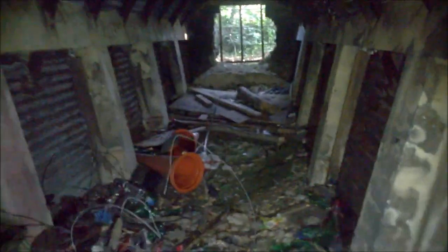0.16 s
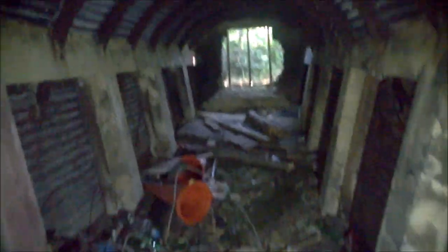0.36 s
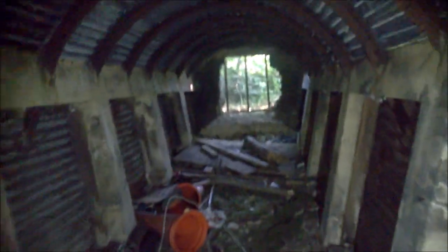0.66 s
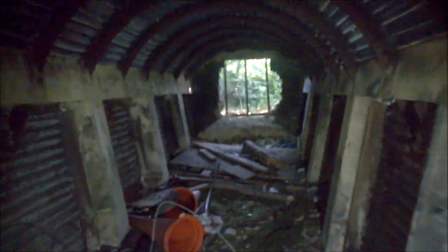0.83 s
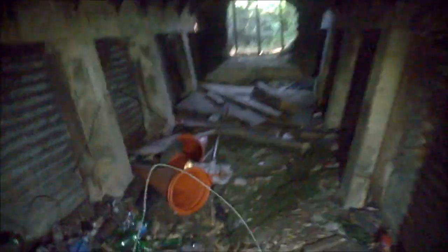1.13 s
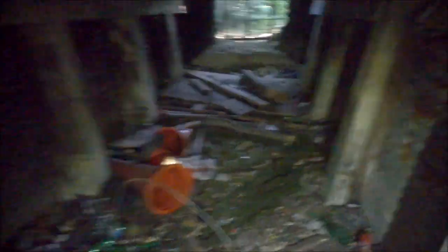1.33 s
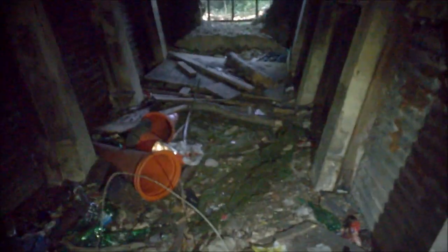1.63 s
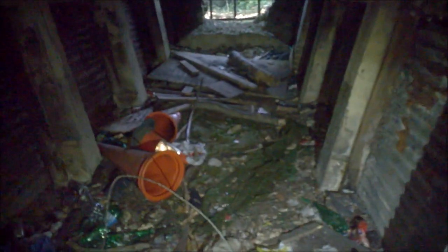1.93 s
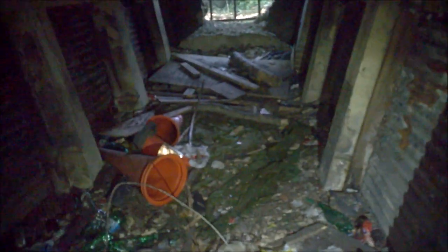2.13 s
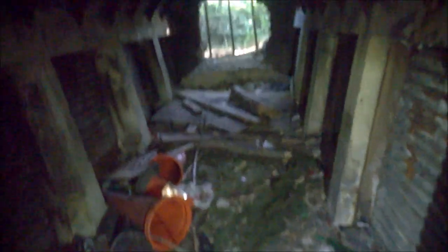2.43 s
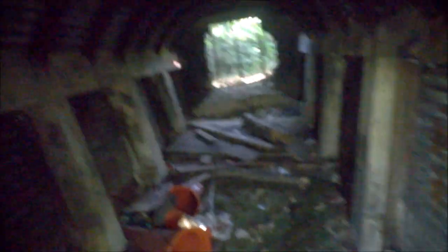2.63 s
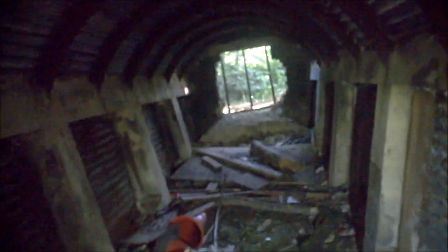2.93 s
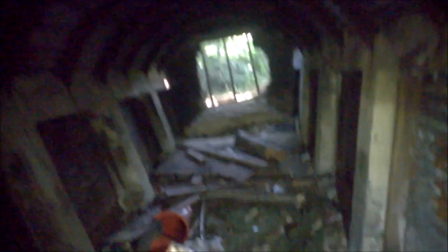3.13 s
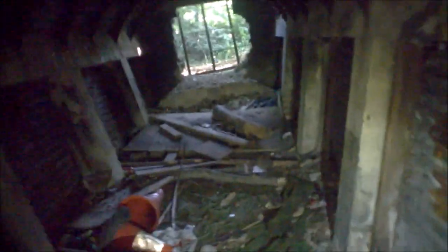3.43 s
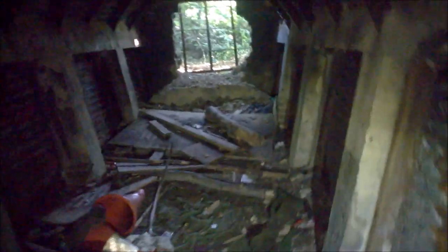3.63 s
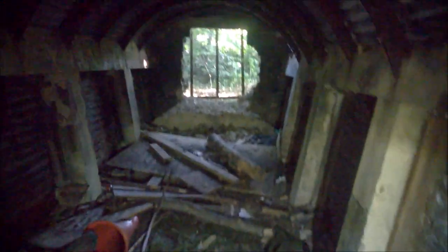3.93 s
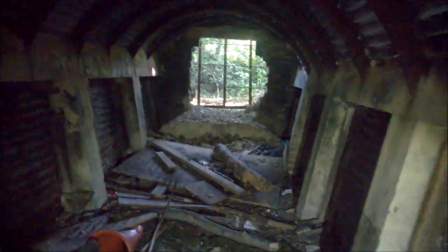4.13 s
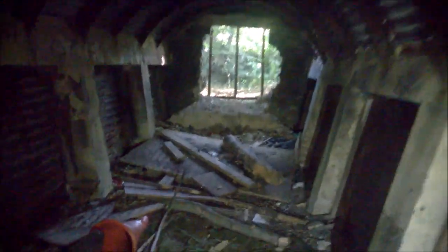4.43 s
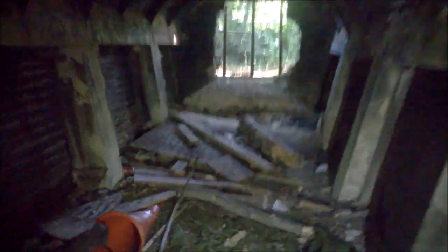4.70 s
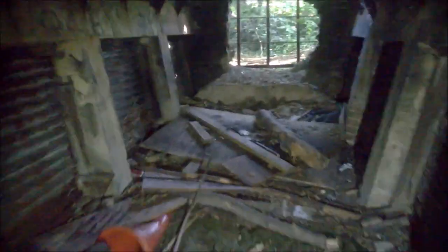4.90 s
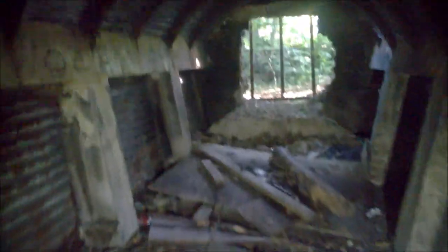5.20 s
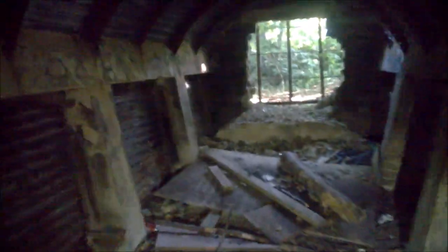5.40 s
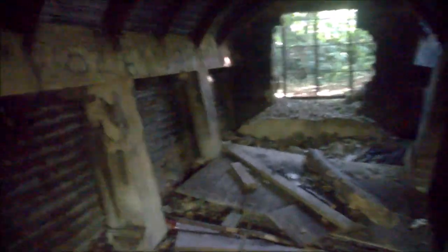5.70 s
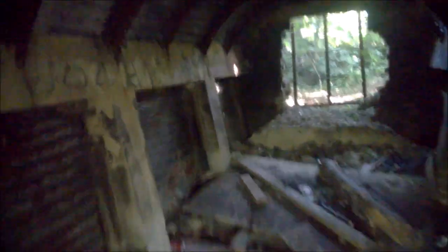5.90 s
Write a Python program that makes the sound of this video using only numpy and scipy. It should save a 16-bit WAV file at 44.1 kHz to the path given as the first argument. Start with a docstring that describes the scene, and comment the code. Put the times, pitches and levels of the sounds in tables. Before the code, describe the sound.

Slow, uneven footsteps cross broken glass and rubble in a narrow concrete tunnel, heard close from a hand-held microphone. Faint air and low handling rumble run throughout, with a soft, airy rustle around 0.3 seconds. From 0.8 to 1.3 seconds a shoe knocks on rubble, grinds grit and snaps shards, and a sliver chinks high and clear at 1.2. Litter ticks lightly as it settles, and a second faint rustle comes around 2.4. More crunching and sandy scraping follow from 2.8 to 3.7, ending in dull knocks. The loudest steps run from about 4.4 to 5.2 seconds, with a sharp, briefly ringing glass snap near 4.7, a gritty scrape at 4.9 and another crack at 5.2. Two light scuffs end the walk at about 5.4 and 5.8. The close walls give every step a dense, short echo.

```python
"""Slow, uneven steps on broken glass and rubble in a narrow concrete tunnel, heard from a hand-held camera.
Faint air and hand rumble come first, with a faint rustle. Near 1 s a shoe knocks on rubble, grinds grit and
snaps shards, and a sliver chinks. After a second rustle, more steps crunch near 3 s and, loudest, near 4.7 s;
between them the litter ticks and settles. Two light scuffs end the walk just before 6 s. Throughout, the close
walls answer the steps with a dense, short echo."""
import sys
import numpy as np
from scipy import signal
from scipy.fft import rfft, irfft
from scipy.io import wavfile
from scipy.ndimage import uniform_filter1d

SR = 44100
rng = np.random.default_rng(int(sys.argv[2]) if len(sys.argv) > 2 else 0)


def put_to_file(sound):
    """Save the sound as 16-bit audio at rate SR, in the file named by the first command-line argument."""
    columns = np.atleast_2d(sound).T  # one column per channel
    safe = np.clip(columns, -1, 1)
    whole_steps = np.round(safe * 32767)
    wavfile.write(sys.argv[1], SR, whole_steps.astype(np.int16))


N = 266981
ECHO_SAMPLES = SR // 2


def amp(db):
    """Turns decibels into a gain."""
    return 10 ** (np.asarray(db) / 20)


def unit_rms(x):
    """Scales a signal to an average power of 1."""
    return x / np.sqrt(np.mean(x ** 2) + 1e-20)


def unit_energy(x):
    """Scales a signal to a total energy of 1."""
    return x / np.linalg.norm(x)


def look_up(points, hz):
    """Reads between the rows of a table on a log-frequency axis."""
    f, value = np.transpose(points)
    return np.interp(np.log(hz + 1), np.log(f + 1), value)


def add(mix, s, sound):
    """Lays a sound into the mix at s seconds."""
    part = mix[round(s * SR):][:len(sound)]
    part += sound[:len(part)]


def pulse(gain, size=4096):
    """The shortest click whose spectrum is gain(Hz); it also serves as a filter."""
    f = abs(np.fft.fftfreq(size, 1 / SR)) + 1
    log_gain = np.log(np.maximum(gain(f), 1e-5))
    spectrum = np.exp(np.conj(signal.hilbert(log_gain)))  # minimum phase: the energy comes early
    return np.fft.ifft(spectrum).real[:size // 2]


def hump(f, hz, octaves):
    """A broad, heavily damped resonance around hz."""
    return 1 / (1 + (np.log2(f / hz) / octaves) ** 2)


def lumps(f, depth_db, count=60):
    """Every piece of debris has its own uneven set of damped resonances."""
    log_hz = np.linspace(np.log(200), np.log(SR / 2), count)
    heights = rng.standard_normal(count).clip(-2, 2)
    return amp(depth_db * np.interp(np.log(f), log_hz, heights))


def wander(per_s):
    """A curve that drifts to a new random value per_s times a second."""
    knots = rng.standard_normal(N // 20)
    return unit_rms(np.interp(np.arange(N) * per_s / SR, np.arange(len(knots)), knots))


def grains(t, colour, per_s, size_db, clump_db, lumpy_db=2):
    """Debris of one size gives way in clumps of tiny fractures, a few of them large."""
    sizes = amp(size_db * np.minimum(rng.exponential(1, N), 4) + clump_db * wander(90))
    clicks = sizes * rng.choice([-1., 1.], N) * (rng.random(N) < per_s / SR)
    one_grain = pulse(lambda f: colour(f) * lumps(f, lumpy_db))
    return unit_rms(signal.fftconvolve(clicks[:len(t)], one_grain)[:len(t)])


def tunnel(direct_db, build_s=0.004033, wall_s=0.0039, wall_gain=0.17666,
           vault_s=0.018868, vault_width_s=0.02419, shade_hz=5500):
    """The direct sound, a slap off the near wall, then echoes that thicken as the roof throws them back."""
    # how long the echo takes to fall by 60 dB: f/Hz, time/s
    echo_times = [(150, 0.34335), (400, 0.31614), (1400, 0.20912), (3700, 0.21823), (9000, 0.18254),
                  (16000, 0.10545)]
    t = np.arange(ECHO_SAMPLES) / SR
    bounces = rng.choice([-1., 1.], len(t)) * amp(2.5 * rng.standard_normal(len(t)).clip(-2, 2))
    bounces *= rng.random(len(t)) < .15 + 2 * t  # sparse at first, then dense
    bounces *= 1 - np.exp(-t / build_s)
    bounces *= 1 + np.exp(-((t - vault_s) / vault_width_s) ** 2)  # a swell from the arched roof
    hz, frame_s, spectra = signal.stft(bounces, SR, nperseg=256)
    fade = amp(-60 * frame_s / look_up(echo_times, hz)[:, None])
    echoes = unit_energy(signal.istft(spectra * fade, SR, nperseg=256)[1][:len(t)])
    shaded = pulse(lambda f: 1 / np.hypot(1, f / shade_hz))  # the camera's body blocks treble from below
    add(echoes, 0, amp(direct_db) * shaded)
    add(echoes, wall_s, wall_gain * shaded)
    return unit_energy(echoes)


def in_tunnel(db, sound, direct_db):
    """Gives a short sound its echo; db is the level it would have if spread over 1/20 s."""
    return amp(db) * np.sqrt(SR / 20) * unit_energy(signal.fftconvolve(sound, tunnel(direct_db)))


def standing_waves(x):
    """The narrow passage favours a few low notes and weakens one."""
    # standing waves between floor and roof: f/Hz, width/Hz, gain/dB
    notes = [(188.53, 6.85, 3.5), (325.26, 29.15, 4), (421.26, 26.27, -3), (458.43, 17.84, 2.5),
             (606.25, 49.07, 2.5)]

    def gain(f):
        return amp(sum(db / (1 + (2 * (f - hz) / width) ** 2) for hz, width, db in notes))
    return signal.oaconvolve(x, pulse(gain, size=16384))[:N]


def noise(colour):
    """Steady noise whose spectrum follows colour(Hz)."""
    f = np.fft.rfftfreq(N, 1 / SR) + 1
    return unit_rms(irfft(rfft(rng.standard_normal(N)) * colour(f), N))


def still_air(level_db=-61.5, waver_db=1.2):
    """The faint hush of the tunnel, wavering a little."""
    # colour of still air and handling rumble: f/Hz, level/dB
    air_colour = [(12, -18), (20, -1), (70, -4.5), (120, -19), (172, -18), (718, -18.5), (1000, -20),
                  (1440, -23), (1660, -24), (2320, -23.5), (2750, -25.5), (3250, -27), (16000, -41)]
    hush = noise(lambda f: amp(look_up(air_colour, f)))
    return amp(level_db) * hush * amp(waver_db * wander(8))


def settling_crumbs(level_db=-73):
    """The litter ticks as it settles, heard mostly as echo."""
    crumbs = grains(np.arange(N) / SR, lambda f: hump(f, 1500, 1.5), per_s=90, size_db=4.5, clump_db=2)
    return amp(level_db) * unit_rms(signal.fftconvolve(crumbs, tunnel(direct_db=-14.5))[:N])


def hand_rumble(gain_db=-1, steady_db=-61.5, hz=46, octaves=0.8751):
    """The hand that carries the camera rumbles, more so when it sways with the walk."""
    # sways of the hand: middle t/s, half length/s, level/dB
    sways = [(.35, 0.4, -53.5), (1.147, 0.3183, -55), (3.504, 0.42, -57.5), (5.247, 0.4686, -53)]
    t = np.arange(N) / SR
    rumble = noise(lambda f: hump(f, hz, octaves) ** 2)
    sway = sum(amp(db) * np.exp(-((t - s) / half_s) ** 2) for s, half_s, db in sways)
    return amp(gain_db) * np.hypot(amp(steady_db), sway) * rumble


def splinter_ticks(hz=8500, octaves=1.137):
    """A splinter parts with one needle-sharp click."""
    # tiny splinters cracking at the edge of the sole: t/s, level/dB
    ticks = [(0.834, -53.5), (1.037, -61.5), (1.1111, -58), (1.1255, -53.5), (1.144, -52.5), (1.194, -44),
             (2.805, -60.5), (3.471, -56.5), (3.789, -63)]
    out = np.zeros(N)
    for s, db in ticks:
        click = pulse(lambda f: hump(f, hz, octaves) * lumps(f, depth_db=2.08))
        add(out, s, in_tunnel(db, click, direct_db=3.5))
    return out


def ringing(tones, detune):
    """The dying tones of a piece of glass, a little different at each blow."""
    t = np.arange(SR // 4) / SR
    ring = np.zeros(len(t))
    for hz, db, fade_s in tones:
        pitch_hz = hz * (1 + detune * rng.uniform(-0.992, 1))
        ring += amp(db - 60 * t / fade_s) * np.sin(2 * np.pi * (pitch_hz * t + rng.random()))
    return unit_energy(ring)


def sliver_chinks():
    """A small sliver springs free under the sole and rings high and clear."""
    # chinks of the sliver: t/s, level/dB, direct sound over echo/dB
    chinks = [(1.186, -43.5, 2.5), (1.1936, -40, 4)]
    # tones of the sliver: f/Hz, level/dB, time to fall by 60 dB/s
    sliver_tones = [(4341.9, -6.5, 0.1498), (4514, -5.5, 0.1238), (4791, -5.5, 0.1305), (6554, 1.5, 0.0365),
                    (7224, 4, 0.0634), (7928, 1.5, 0.0526)]
    out = np.zeros(N)
    for s, db, direct_db in chinks:
        add(out, s, in_tunnel(db, ringing(sliver_tones, detune=0.001013), direct_db))
    return out


def rubble_knocks(gain_db=-1, rock_s=0.0030025, rock_gain=0.8533, again_s=0.0065064, again_gain=0.6367,
                  weight_hz=112, soft_hz=2400):
    """A dull blow with the walker's weight behind it; the loose piece rocks and lands twice more."""
    # shoe and rubble hitting the floor:
    # t/s, level/dB, f/Hz, width/octaves, direct sound over echo/dB, body weight/dB
    knocks = [(0.787, -48, 378.9, 0.587, -4, -23.5), (0.801, -46, 464.3, 1.169, -5, 0),
              (0.9596, -52, 531, 0.3986, 4, -28.5), (1.0155, -50, 546, 1.488, 15.5, -29.5),
              (1.095, -41.5, 491.8, 0.5127, -6.5, -37.5), (1.238, -43, 505.3, 0.821, -1.5, -33),
              (1.419, -56, 316.8, 0.895, -1, 1.5), (1.779, -58, 427.6, 0.5426, -0.5, -34),
              (1.897, -58.5, 480.9, 0.949, -3, -11), (3.251, -44, 447, 0.745, -5.5, -8.5),
              (3.2635, -43.5, 540.3, 0.4202, 18, -12), (3.2955, -36.5, 515.8, 0.2754, 11, -6.5),
              (3.3542, -39.5, 558.5, 0.833, 10, -21.5), (3.42, -36.5, 571.3, 0.2436, 11.5, -13.5),
              (3.549, -39.5, 591, 0.957, 2.5, -15.5), (3.578, -31.5, 341, 0.4725, 8.5, -12),
              (3.851, -57, 874.3, 0.6784, 3, -9), (4.331, -56, 501.1, 0.719, 8.5, -30.5),
              (4.373, -51.5, 479.2, 0.8555, -2.5, -28.5), (4.4625, -45, 591.3, 1.183, 5, -45.5),
              (4.6085, -33.5, 719.3, 0.203, 6, -32.5), (4.618, -45.5, 321.2, 0.756, 0.5, -30.5),
              (4.634, -43.5, 905.6, 0.1808, -3, -16.5), (4.887, -40.5, 670.6, 0.4522, 5, -28.5),
              (4.958, -40.5, 260.7, 2.562, -15.5, -20.5), (5.407, -57, 650, 1.13, 2, -43.5),
              (5.6215, -51.5, 874.1, 1.0866, 4, -7.5), (5.815, -53.5, 896.5, 0.2363, -8.5, -35),
              (5.886, -53, 256, 0.92, -15, -4.5)]
    out = np.zeros(N)
    for s, db, hz, octaves, direct_db, weight_db in knocks:
        def colour(f):
            piece = hump(f, hz, octaves) * lumps(f, depth_db=1.5)
            weight = amp(weight_db) * hump(f, weight_hz, 1.0)
            return (piece + weight) / np.hypot(1, (f / soft_hz) ** 2)
        thud = pulse(colour)
        rocking = thud.copy()
        add(rocking, rock_s * rng.uniform(0.7131, 1.2997), rock_gain * thud)
        add(rocking, again_s * rng.uniform(0.7265, 1.2051), again_gain * thud)
        add(out, s, in_tunnel(db + gain_db, rocking, direct_db))
    return out


def swell(t, rise_s, fade_s, rise_power=1.1978, fall_power=1.2622):
    """The sound grows, then dies ever faster, as when weight comes onto a sole and off again."""
    rise = np.clip(t / rise_s, 0, 1) ** rise_power
    fall_db = -20 * (np.maximum(t - rise_s, 0) / fade_s) ** fall_power
    return rise * amp(fall_db)


def layer_gains(t, start, end, rubble_linger=0.9781, sand_linger=0.8815):
    """How loud the rubble, grit and sand layers are during one stroke or rustle; sand stops soonest."""
    # presses of heel, ball or toe, and the swells of the two faint rustles:
    # t/s, rise/s, time to fall by 20 dB/s, grit level/dB, rubble over grit/dB, sand over grit/dB
    swells = [(.13, 0.19305, 0.1179, -56, -6.5, -6.5), (.785, 0.03855, 0.1111, -40.5, -1.5, 0.5),
              (.865, 0.01859, 0.1229, -48.5, 2.5, -12), (.955, 0.00868, 0.2127, -48, -0.5, -9),
              (1.008, 0.01567, 0.1981, -45.5, -0.5, -9), (1.092, 0.02474, 0.1579, -39, -1, -5),
              (1.17, 0.02138, 0.1004, -35.5, -2, -3.5), (1.215, 0.02102, 0.0942, -39.5, 0, -6),
              (1.27, 0.01524, 0.03, -46.5, 2, -1), (1.33, 0.04156, 0.0554, -63.5, 10, -11.5),
              (2.22, 0.1135, 0.0062, -61, -11, -20.5), (2.42, 0.014956, 0.1274, -55.5, -13.5, -7.5),
              (2.48, 0.02693, 0.0644, -53, -13, -6), (2.63, 0.01487, 0.0672, -57, -19, -2),
              (2.794, 0.00955, 0.1347, -51.5, 1, -3), (2.865, 0.055, 0.112, -46, -6, -8.5),
              (2.92, 0.03507, 0.0752, -45, -0.5, 4.5), (2.975, 0.0267, 0.3363, -48, -2.5, -1.5),
              (3.17, 0.08785, 0.254, -45.5, -0.5, -2.5), (3.3, 0.03348, 0.2073, -41.5, -5, -3.5),
              (3.416, 0.0106, 0.0839, -47, 8.5, -6), (3.45, 0.11293, 0.1409, -42, -1, -0.5),
              (3.574, 0.00675, 0.0923, -39, -2, -3.5), (4.2, 0.02803, 0.32, -62.5, -2.5, -1.5),
              (4.365, 0.02346, 0.8174, -59.5, 5.5, -2), (4.46, 0.00795, 0.0118, -43.5, 0.5, -2.5),
              (4.578, 0.02411, 0.1136, -49, 9, -1), (4.63, 0.00838, 0.0958, -38.5, -10, 0.5),
              (4.662, 0.00845, 0.0893, -35.5, -2, -6), (4.74, 0.036, 0.01, -58.5, -0.5, -3),
              (4.785, 0.09118, 0.1793, -45, 0, 3), (4.899, 0.06982, 0.0988, -37, -3.5, 1.5),
              (5.035, 0.0251, 0.0218, -46, -7.5, 5.5), (5.1, 0.04883, 0.1756, -66, 11.5, 5),
              (5.205, 0.0144, 0.0386, -44, -20, 10), (5.385, 0.05427, 0.0744, -50.5, 0, -3.5),
              (5.73, 0.10727, 0.0895, -52, -3, -21), (5.872, 0.02642, 0.0484, -53.5, 0, 6)]
    rubble, grit, sand = np.zeros((3, len(t)))
    for s, rise_s, fade_s, db, rubble_db, sand_db in swells:
        if start <= s + rise_s < end:
            rubble = np.hypot(rubble, amp(db + rubble_db) * swell(t - s, rise_s, fade_s * rubble_linger))
            grit = np.hypot(grit, amp(db) * swell(t - s, rise_s, fade_s))
            sand = np.hypot(sand, amp(db + sand_db) * swell(t - s, rise_s, fade_s * sand_linger))
    return rubble, grit, sand


def paced(x, window_s=0.05078):
    """Debris only gives back the work put in: a large fracture leaves less for its neighbours."""
    power = abs(uniform_filter1d(x ** 2, round(window_s * SR)))
    smooth_power = uniform_filter1d(power, round(window_s * SR / 2))
    return unit_rms(x / np.sqrt(smooth_power + 1e-3))


def grinding_and_rustles(rubble_db=-5, grit_db=-4.5, sand_db=-4.5, crackle_db=-14,
                         roll_on_s=.2, shift_s=0.060077):
    """Rubble rolls, glass grit crunches and sand scrapes under the shoe; splinters crackle at its edge. The
    same layers, played softly, make the two faint rustles."""
    # strokes of a sole, and two faint rustles (from 0.14 s and 2.2 s): start/s, end/s
    spans = [(.14, .6), (.78, .95), (.95, 1.6), (2.2, 2.79), (2.79, 3.19), (3.19, 3.78), (4.2, 4.59),
             (4.59, 4.8), (4.8, 5.36), (5.37, 5.55), (5.72, 6.04)]
    # colour of each stroke or rustle: rubble f/Hz, rubble width/octaves, shard f/Hz, shard ring/dB
    colours = [(650.8, 1.215, 1918, 4), (429, 0.9607, 2311.7, 5), (473.25, 0.71, 3148, 3.5),
               (455.1, 0.378, 1157.8, 9), (486.7, 1.086, 1786.6, 4.5), (359, 1.1657, 1071, 2),
               (508, 0.9366, 1554.5, 5.5), (398.15, 1.1347, 2460, 6.5), (427.9, 1.225, 1363.3, 5.5),
               (536.5, 1.397, 2369.9, 14), (726, 2.664, 978.7, 2)]
    # colour of glass grit: f/Hz, level/dB
    grit_levels = [(400, -27.5), (900, 3.5), (1300, 0), (2300, -1.5), (4400, -5.5), (6500, -21),
                   (12000, -37)]
    # colour of sand: f/Hz, level/dB
    sand_levels = [(2500, -24), (5000, -3.5), (7200, -1.5), (9000, -3.5), (13000, -3.5), (16000, -6)]
    out = np.zeros(N)
    for (start, end), (hz, octaves, shard_hz, ring_db) in zip(spans, colours):
        def rubble_colour(f):
            weight = 0.2546 * hump(f, hz=95, octaves=0.4804)
            return hump(f, hz, octaves) / (1 + (f / 1200) ** 2) + weight
        grit_colour = lambda f: amp(look_up(grit_levels, f) + ring_db * hump(f, shard_hz, .14))
        sand_colour = lambda f: amp(look_up(sand_levels, f))
        t = np.arange(start, end + roll_on_s, 1 / SR)
        rubble_gain, grit_gain, sand_gain = layer_gains(t, start, end)
        crackle = paced(grains(t, lambda f: hump(f, 7000, 1.0), per_s=90, size_db=2.5, clump_db=2))
        crackle *= amp(crackle_db) * np.hypot(grit_gain, sand_gain)
        add(out, start, signal.fftconvolve(crackle, tunnel(direct_db=4)))
        rubble = paced(grains(t, rubble_colour, per_s=700, size_db=3.5, clump_db=3))
        grit = paced(grains(t, grit_colour, per_s=1100, size_db=4, clump_db=5, lumpy_db=0.7248))
        sand = paced(grains(t, sand_colour, per_s=1400, size_db=4.5, clump_db=4, lumpy_db=1))
        layers = amp(rubble_db) * rubble_gain * rubble
        layers += amp(grit_db) * grit_gain * grit
        layers += amp(sand_db) * sand_gain * sand
        # as walker and camera move, three patterns of echoes take turns
        for turn in range(3):
            turns_away = abs(((t - start) / shift_s - turn + 1.5) % 3 - 1.5)
            share = np.cos(np.pi / 2 * np.minimum(turns_away, 1))
            add(out, start, signal.fftconvolve(layers * share, tunnel(direct_db=-3)))
    return out


def bending_waves(x, delay_s=0.0012905, hz=5868):
    """In a flat shard the treble travels fastest; the bass arrives up to delay_s later."""
    f = np.fft.rfftfreq(2 * len(x), 1 / SR)
    lag_cycles = np.cumsum(delay_s / (1 + f / hz)) * f[1]
    return irfft(rfft(x, 2 * len(x)) * np.exp(-2j * np.pi * lag_cycles))[:len(x)]


def shard_snaps(gain_db=-1, crumbs_per_s=350, crumb_gain=0.438, crumble_s=0.010533):
    """A shard breaks with one sharp click, sheds a few crumbs and rings briefly."""
    # shards and chips that snap:
    # t/s, level/dB, f/Hz, width/octaves, splinter fizz/dB, direct sound over echo/dB, glass ring/dB
    snaps = [(0.819, -48.5, 2993, 1.028, -7.5, -1.5, -20), (0.9593, -47, 1850, 0.4013, -36, -1, -15),
             (1.0160, -46, 2401, 0.7634, -35, -7.5, -12.5), (1.096, -39.5, 1372, 0.663, -42, -8, -22),
             (1.1736, -37.5, 1696, 1.253, -13.5, -9.5, -24.5),
             (1.1845, -35.5, 4235, 0.3654, -24.5, -2.5, -32.5), (1.233, -39, 2402, 0.907, -24, -4.5, -25.5),
             (1.2776, -54, 3013, 2.06, -5.5, 2, -21), (1.7794, -61.5, 1876, 0.56, -27.5, 5, -16.5),
             (1.8883, -48.5, 2198, 0.524, -52, -8, -21), (2.0643, -55, 2900, 0.4636, -44, 0, -22.5),
             (2.735, -59, 3526, 0.8876, -29.5, -4, -24), (2.799, -56.5, 1199, 1.108, -18.5, -5.5, -28.5),
             (2.815, -54, 1299, 0.928, -28, -1.5, -23.5), (3.2635, -43, 1306, 0.424, -35.5, -1.5, -24.5),
             (3.354, -41, 1143, 0.485, -43.5, 5.5, -22), (3.549, -44, 963, 1.033, -31.5, -4.5, -19.5),
             (3.579, -34, 1310, 0.8016, -22, 3, -29), (4.0995, -53, 2038, 0.69, -48, -2, -20),
             (4.118, -57, 3433, 0.225, -37.5, -6, -17.5), (4.443, -45.5, 1431, 0.3288, -49, -2, -22.5),
             (4.4629, -45, 1684, 1.1144, -13.5, -6.5, -21.5),
             (4.6185, -48.5, 5467, 0.3122, -20.5, 0.5, -24), (4.6352, -38, 2219, 0.426, -31, 1, -7.5),
             (4.6422, -39, 6040, 0.476, -20, -1, -21), (4.6662, -27.5, 2900, 0.5786, -23, 6.5, -13),
             (4.6714, -37, 3197, 0.704, -21.5, 6.5, -13), (4.8601, -37, 2454, 0.366, -31.5, 3, -1.5),
             (4.8884, -38.5, 2147, 0.902, -38.5, 1, -8.5), (5.2061, -32.5, 957.1, 0.7298, -2.5, -2, -35),
             (5.2125, -40.5, 8980, 1.398, -5, -4, -30), (5.4451, -55, 2170, 0.891, -16, 3, -21),
             (5.5302, -48, 5142, 0.429, -6, -7.5, -22.5), (5.6226, -50.5, 3396, 0.4055, -35, -0.5, -9.5)]
    # tones of a flat shard: f/Hz, level/dB, time to fall by 60 dB/s
    shard_tones = [(2010.5, -3.5, 0.155), (2147.3, 2.5, 0.0787), (2249.5, 1, 0.1233), (2334.9, 3, 0.1255),
                   (2388.4, 3, 0.1658), (3105.9, -5.5, 0.111), (3298.6, -5.5, 0.1642),
                   (3595.6, -5.5, 0.155), (4290, -11, 0.1575)]
    out, t = np.zeros(N), np.arange(SR // 4) / SR
    for s, db, hz, octaves, fizz_db, direct_db, ring_db in snaps:
        fizz = lambda f: amp(fizz_db) * f / np.hypot(f, 5000)
        click = pulse(lambda f: np.hypot(hump(f, hz, octaves), fizz(f)) * lumps(f, depth_db=2))
        shard = amp(ring_db) * ringing(shard_tones, detune=0.004322)
        add(shard, 0, unit_energy(bending_waves(click)))
        crumbs = rng.standard_normal(len(t)) * (rng.random(len(t)) < crumbs_per_s / SR)
        force = crumb_gain * crumbs * np.exp(-t / crumble_s)
        force[0] = 1  # the break itself
        snap = signal.fftconvolve(force, shard)[:len(t)]
        add(out, s, in_tunnel(db + gain_db, snap, direct_db))
    return out


def scene():
    """Steps on the littered floor and two faint rustles, over the quiet of the tunnel."""
    walk = shard_snaps() + splinter_ticks() + sliver_chinks() + rubble_knocks() + grinding_and_rustles()
    background = still_air() + settling_crumbs() + hand_rumble()
    return (standing_waves(walk) + background)[None]


def record(dry, top_hz=15800):
    """A small camera microphone colours the sound, and the highest treble is cut off."""
    # colour of the microphone: f/Hz, gain/dB
    mic_colour = [(100, 0), (3000, -1.5), (4500, -0.5), (5600, -1.5), (7200, -1), (8200, -3.5),
                  (11000, -1.5), (13000, 1), (15500, 0)]
    microphone = pulse(lambda f: amp(look_up(mic_colour, f)))
    coloured = signal.oaconvolve(dry, microphone[None])[:, :N]
    low_pass = signal.firwin(511, top_hz, window=("kaiser", 9), fs=SR)
    return signal.oaconvolve(coloured, low_pass[None], "same")


dry = scene()
out = record(dry)
put_to_file(out)
```